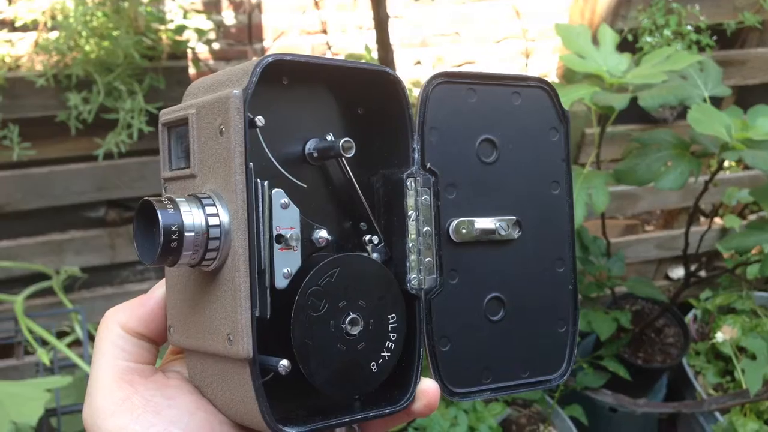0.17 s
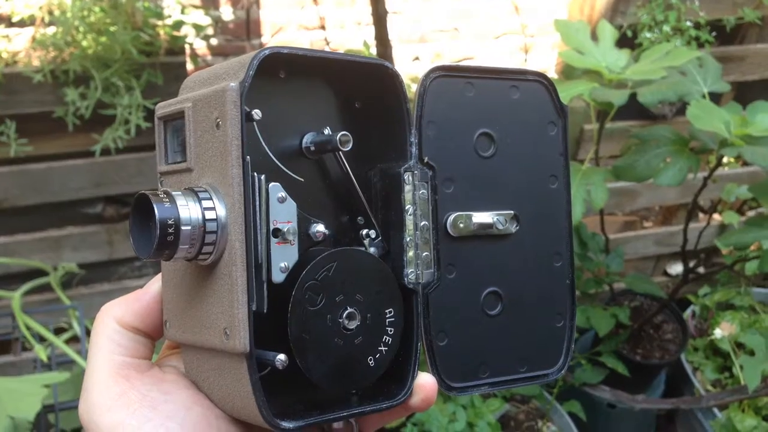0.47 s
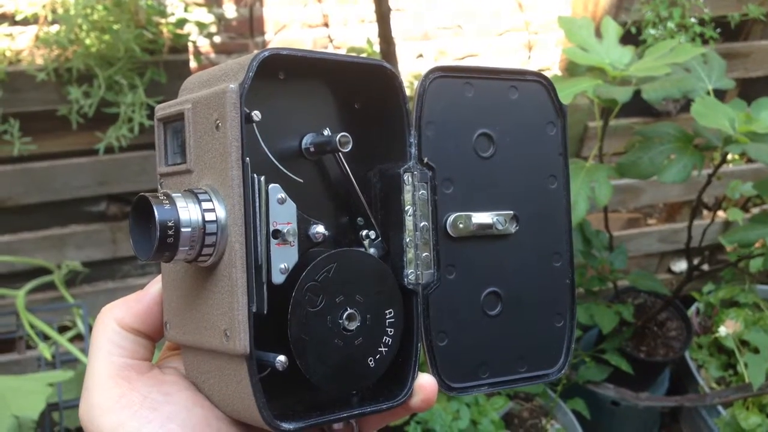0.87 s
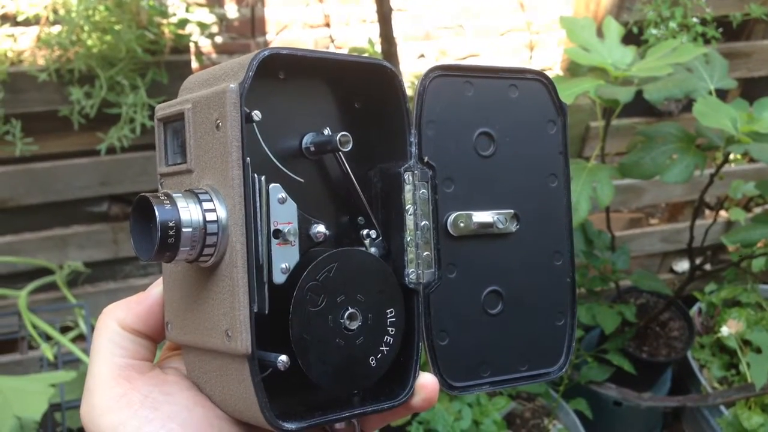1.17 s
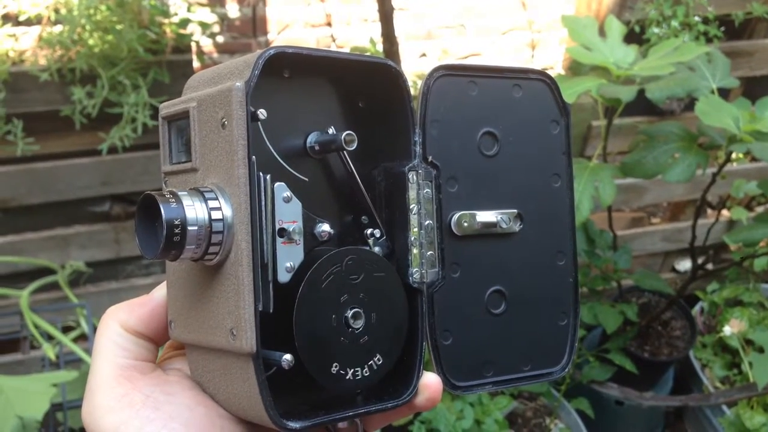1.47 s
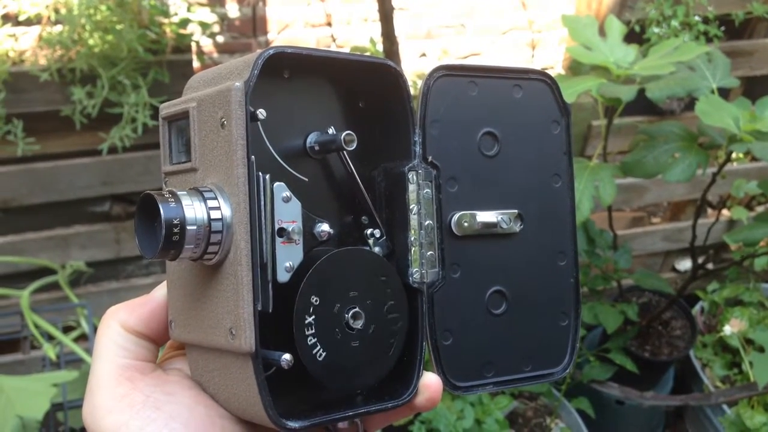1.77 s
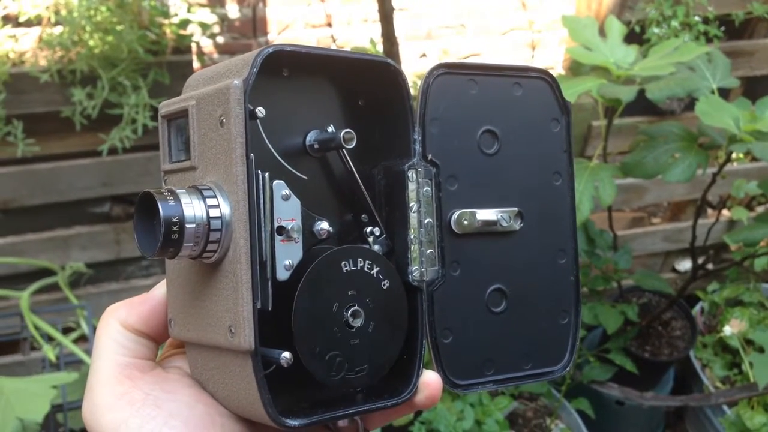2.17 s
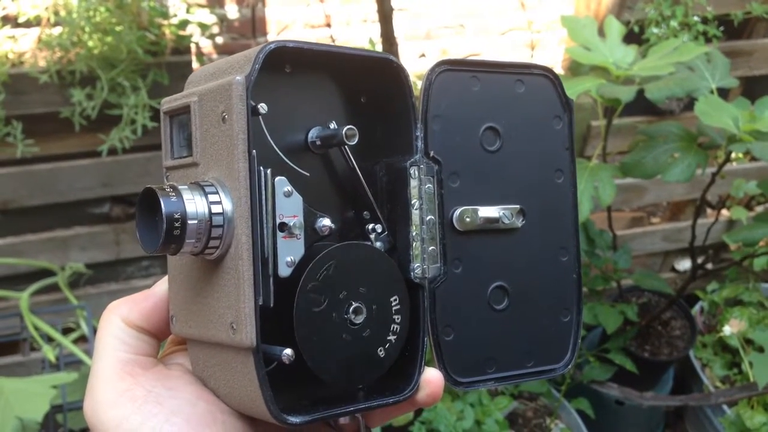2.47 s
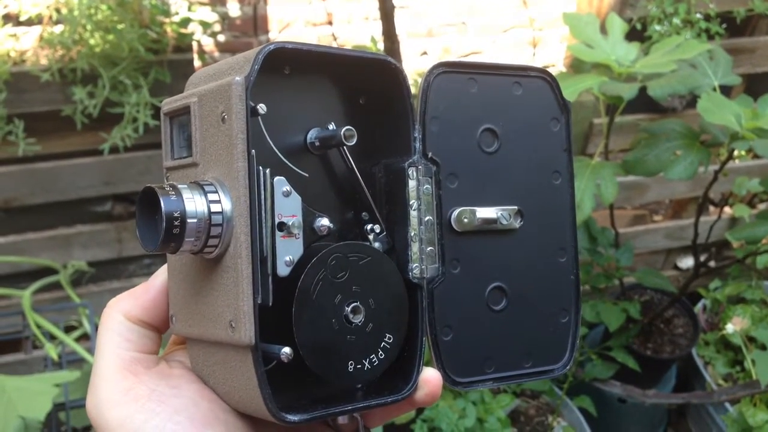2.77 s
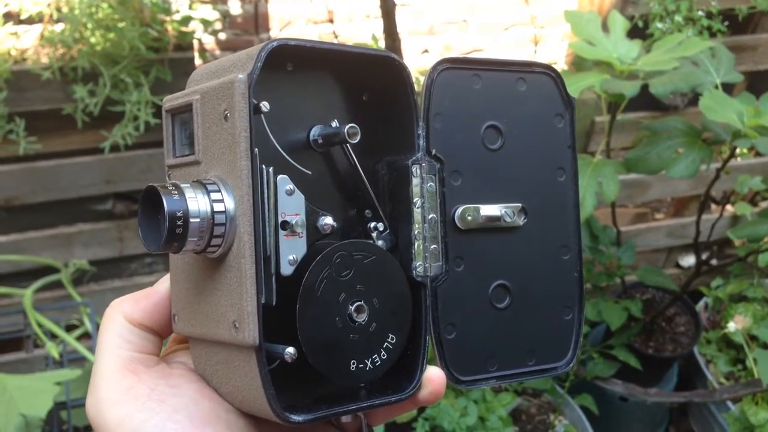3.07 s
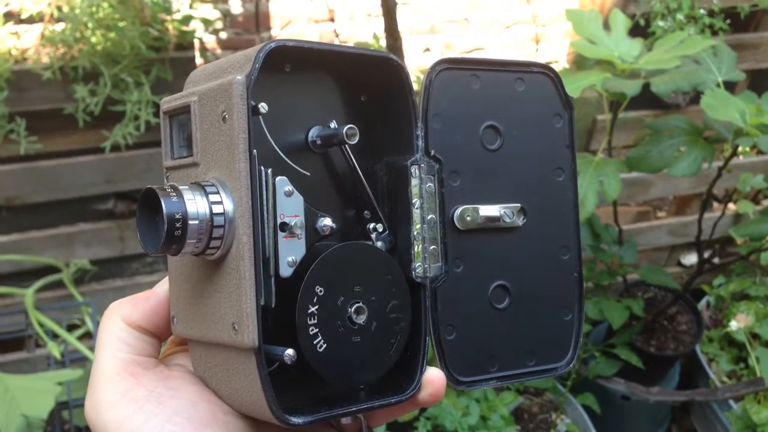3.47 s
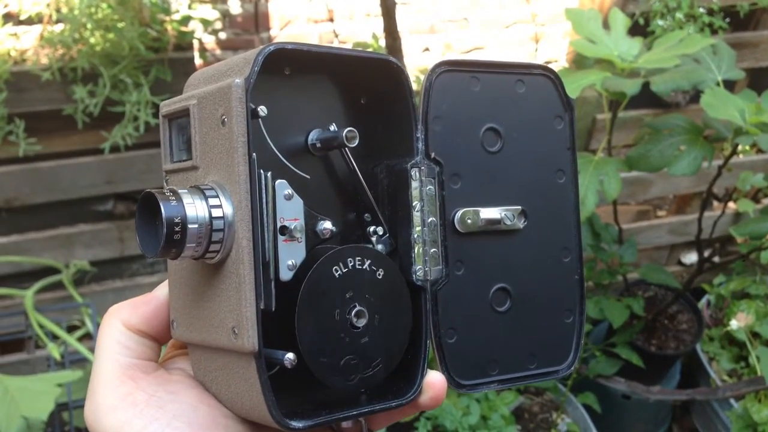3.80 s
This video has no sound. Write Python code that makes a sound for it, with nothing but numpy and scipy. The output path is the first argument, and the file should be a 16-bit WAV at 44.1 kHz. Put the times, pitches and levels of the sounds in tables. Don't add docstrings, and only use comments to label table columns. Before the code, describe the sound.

Spring-driven camera mechanism rattles in quick thin ticks, snaps off, then restarts faintly over outdoor hiss.

```python
import sys
import numpy as np
from scipy import signal
from scipy.io import wavfile
from scipy.ndimage import uniform_filter1d

SR = 44100
rng = np.random.default_rng(int(sys.argv[2]) if len(sys.argv) > 2 else 0)


def volts(x):
    e = np.asarray(x, float) / 20
    return 10 ** e


def log_audio(samples):
    frames = np.atleast_2d(samples).T
    limited = np.clip(frames, -1, 1)
    pcm = np.round(limited * 32767).astype(np.int16)
    wavfile.write(sys.argv[1], SR, pcm)


N = 173754

START_S = .1202
# (frequency [Hz], level [dB per Hz])
LOW_AIR = [(25, -48), (55, -13), (75, -5.5), (95, -12), (125, -3),
           (150, -7.5), (200, -5), (260, -10), (320, -11), (500, -11), (750, -14.5), (1200, -22)]
HISS = [(1000, -1), (2400, -2.5), (2800, -4.5), (3750, -1.5), (4800, -6.5), (7500, -13.5), (12100, -22),
        (15200, -24)]
RUMBLE_SPECTRUM = [(10, -60)] + LOW_AIR + [(2500, -38), (9000, -62)]
HISS_SPECTRUM = [(300, -29.5)] + HISS
RUMBLE_DB, HISS_DB, SWELL_DB = -50.5, -50, .3

# (frequency [Hz], level [dB rms])
HUM = [(59.3, -78), (119.9, -49.5), (158.5, -63.5), (765.4, -68.5), (857.5, -70.5)]
COMPRESSOR_DB = [-64.5, -59.5, -72, -65.5, -74, -69, -69.5, -67.5, -68.5, -73.5]
COMPRESSOR_HZ = 69.12
# (time [s], level [dB rms])
FAN = [(0, -56), (.55, -53), (.85, -59), (1.15, -53), (1.4, -59), (2.2, -63), (2.8, -66), (3.02, -57),
       (3.2, -64), (3.94, -66)]
FAN_HZ = 80.5

# (time [s], level [dB])
DRIVE = [(1.37, -70), (1.39, 2), (1.6, -10), (1.85, -5.5), (2.1, -6.5), (2.4, -5), (2.66, -5), (2.71, -1),
         (2.725, 10), (2.74, -70), (3.165, -70), (3.19, -5.5), (3.5, -3), (3.62, -6), (3.94, -4)]
WHIR_DB, WHIR_FOLLOW = -55, .7

# (time [s], peak level [dB])
LONE_TICKS = [(1.3856, -46), (1.3934, -48), (1.4284, -48), (1.4691, -43), (1.51, -46), (1.5138, -47),
              (1.5355, -52), (2.0535, -46), (2.0685, -45), (2.1437, -49), (2.7965, -54), (2.877, -56),
              (3.1903, -50), (3.1976, -46), (3.2374, -47), (3.3188, -50), (3.3978, -53), (3.4097, -47),
              (3.4355, -49), (3.5004, -50), (3.5553, -49), (3.59, -53), (3.6504, -47), (3.6537, -49),
              (3.6815, -50), (3.6854, -48), (3.776, -47), (3.7818, -50), (3.8675, -52), (3.872, -51),
              (3.8766, -48)]
LONE_DB = 5
SLOW_STROKES = [
    1.3856,
    1.4284,
    1.4691,
    1.51,
    3.1903,
    3.2374,
    3.4097,
]
SLOW_STROKE_DB, GATE_S = -7, .012
# (time [s], grip [dB], pull [dB], return [dB], gate plate ringing [dB])
STROKES = [(1.5593, 0, -10, -10, -8), (1.5904, -2, 5, -10, 4), (1.6213, -10, -3, -10, -8),
           (1.6521, 4, 4, -5, -8), (1.683, 1, 2, 2, 7), (1.7149, -2, 4, -10, 0), (1.7459, -1, 4, -8, 1),
           (1.7762, -6, -1, 1, 3), (1.8097, -10, -7, -5, -3), (1.839, 2, 6, -1, 6), (1.8698, 2, 1, -10, 3),
           (1.9023, -1, 3, 4, 9), (1.9328, 4, 4, 0, -8), (1.9636, 0, 1, -10, 5), (1.9962, 1, 6, -6, 0),
           (2.0272, 2, 5, 2, 7), (2.0586, -3, 0, 4, 7), (2.09, 5, 6, 0, 0), (2.1206, 4, 7, -1, -8),
           (2.152, -3, 4, 4, 1), (2.1831, 0, 5, 0, 5), (2.2139, 3, 1, 1, 2), (2.2451, -1, 6, -7, 4),
           (2.2763, 3, 1, 4, 8), (2.3071, 1, 4, -10, 1), (2.339, 4, 2, 6, 8), (2.3697, 5, 4, 2, 9),
           (2.4008, 9, 2, 3, -6), (2.4323, 2, 1, 4, 11), (2.4632, 0, 5, 3, -5), (2.495, -1, 3, 2, 3),
           (2.5268, 0, 7, 4, -1), (2.5573, 7, 4, -4, -1), (2.5883, 1, 0, 3, 10), (2.6202, 0, 3, 4, 2),
           (2.6508, 1, 1, 4, 7), (2.6825, 1, -4, -5, -8)]
# (first stroke [s], last stroke [s], rate [strokes per s], level [dB])
SECOND_RUN = (3.5565, 3.94, 32.04, -9)
# (delay [s], brightness [dB per octave])
STROKE_PARTS = [
    (-.0001, 1.5),
    (.006, 1),
    (.0099, -1.5),
]
TICK_DB, JITTER_S, SPREAD_DB = -39.5, .00025, 3
# (frequency [Hz], level [dB])
SNAP = [(800, -5), (2000, 0), (4500, 1), (7000, -3), (11000, -8.5), (13300, -15.5), (14300, -22),
        (15300, -24)]
SNAP_DB, SNAP_T60 = -8, .006
# (frequency [Hz], level [dB], t60 [s])
BODY = [(2166, -3, .014), (2568, -5, 0.029), (3385, 0, 0.014), (3910, 2.5, 0.0092), (4440, -9, 0.0056),
        (5000, -3.5, 0.0086), (5505, -3, 0.0088), (6020, -3, 0.0093), (8350, -15.5, 0.0089),
        (9140, -15, 0.009), (11800, -14, 0.013), (12600, -12.5, 0.0091), (12800, -11, 0.011),
        (13800, -21, .01)]
MIX_DB, DETUNE = 4, .006
PLATE_HZ, PLATE_DB, PLATE_T60 = 1592, -54, 0.034

# (time [s], modes level [dB], crack level [dB])
LATCH = [
    (2.7213, -39, -42),
    (2.7255, -13, -29),
    (2.7293, -30, -36),
    (2.7385, -35, -52),
    (2.748, -43, -52),
]
# (frequency [Hz], level [dB], t60 [s])
LATCH_MODES = [(575, -14, 0.05), (870, -15, 0.03), (1150, -12, 0.016), (1400, -9, .016), (1620, -10, .016),
               (1990, -3, 0.026), (2270, -2.5, 0.027), (2570, -12, 0.03), (3380, -20, 0.014),
               (5254, -26, .025), (5642, -14, 0.03), (6400, -25, 0.02), (7300, -25, .012)]
LATCH_RISE_S, LATCH_SHARE = .0009, .55
# (frequency [Hz], level [dB])
CRACK = [(300, -21), (1000, 0), (4500, -4.5), (7000, 1), (9500, -6), (11500, -9), (13000, -13),
         (15500, -16)]
CRACK_T60 = 0.011
# (frequency [Hz], level [dB])
TAIL = [(200, -59), (500, -32), (2200, -1), (6000, -21), (10000, -22.5)]
TAIL_DB, TAIL_T60 = -23, .08

# (time [s], level [dB rms])
ENGINE = [(0, -90), (3.6, -89), (3.75, -60), (3.94, -54.5)]
ENGINE_HZ = 384
EDGE_HZ, EDGE_DB = 15250, -38


def evened(x):
    return x / np.sqrt(np.mean(x ** 2) + 1e-20)


def curve(points):
    s, value = np.transpose(points)
    return np.interp(np.arange(N) / SR, s, value)


def read(points, hz):
    f, value = np.transpose(points)
    return np.interp(np.log(hz + 1), np.log(f + 1), value)


def coloured(x, points):
    log_gain = np.log(volts(read(points, abs(np.fft.fftfreq(2048, 1 / SR)))))
    taps = np.fft.ifft(np.exp(np.conj(signal.hilbert(log_gain)))).real[:1024]
    return signal.oaconvolve(x, taps / np.linalg.norm(taps))[:len(x)]


def slow(hz):
    t = np.arange(0, N + 256, 256) / SR
    rates = hz * np.geomspace(.05, 1, 20)
    waves = sum(np.sin(2 * np.pi * (f * t + rng.random())) / np.sqrt(f) for f in rates)
    return np.interp(np.arange(N) / SR, t, evened(waves))


def ring(hz, t60, size=3000):
    t = np.arange(size) / SR
    return volts(-60 * t / t60) * np.sin(2 * np.pi * hz * t)


def wash(points, db, patchy_db):
    a, b, patches = rng.standard_normal((N // 512 + 6, 1025, 3)).T
    patches = uniform_filter1d(patches, size=20, axis=0)
    patches = evened(uniform_filter1d(patches, size=6, axis=1))
    shape_db = read(points, np.fft.rfftfreq(2048, 1 / SR))[:, None]
    z = (a + 1j * b) * volts(shape_db + patchy_db * patches)
    noise = signal.istft(z, nperseg=2048, noverlap=1536)[1][:N]
    return evened(noise) * volts(db + SWELL_DB * slow(2.84))


def tone(hz, db, level_drift_db=2.5, phase_drift=.4):
    t = np.arange(N) / SR
    level = np.sqrt(2) * volts(db + level_drift_db * slow(5))
    return level * np.sin(2 * np.pi * (hz * t + rng.random()) + phase_drift * slow(4.01))


def garden():
    return wash(RUMBLE_SPECTRUM, RUMBLE_DB, 0.74) + wash(HISS_SPECTRUM, HISS_DB, 0.96)


def mains_hum():
    steady = sum(tone(hz, db, .8, .1) for hz, db in HUM[:2])
    return steady + sum(tone(hz, db) for hz, db in HUM[2:])


def compressor():
    return sum(tone((k + 1) * COMPRESSOR_HZ, db) for k, db in enumerate(COMPRESSOR_DB))


def far_fan():
    return tone(FAN_HZ, curve(FAN))


def gear_whir(window):
    clicks = volts(1.5 * np.minimum(rng.exponential(1, N), 4)) * rng.standard_normal(N)
    rattle = clicks * (rng.random(N) < 5000 / SR)
    return evened(rattle) * volts(WHIR_DB + WHIR_FOLLOW * curve(DRIVE)) * (.5 + window)


def claw():
    first, last, rate, db = SECOND_RUN
    later = np.arange(first, last - .012, 1 / rate)
    later_db = db + SPREAD_DB * rng.standard_normal((len(later), 4))
    strokes = np.r_[STROKES, np.c_[later, later_db]]
    delay, tilt = np.transpose(STROKE_PARTS)
    jitter = JITTER_S * rng.standard_normal((len(strokes), 3))
    at = ((strokes[:, :1] + delay + jitter) * SR).astype(int)
    plate = np.zeros(N)
    plate[at[:, -1]] = volts(PLATE_DB + strokes[:, -1])
    marks = np.zeros(N)
    marks[(np.r_[strokes[:, 0], SLOW_STROKES] * SR).astype(int)] = volts(SLOW_STROKE_DB)
    marks[at[:len(STROKES), 0]] = 1 - volts(SLOW_STROKE_DB)
    t = np.arange(2000) / SR
    gate = np.clip(np.minimum(t, GATE_S + .004 - t) / .003, 0, 1)
    window = signal.oaconvolve(marks, gate)[:N]
    lone_s, lone_db = np.transpose(LONE_TICKS)
    ticks = np.r_[at.ravel(), (lone_s * SR).astype(int)]
    size = np.r_[volts(TICK_DB + strokes[:, 1:-1]).ravel(), volts(lone_db + LONE_DB)]
    tilts = np.r_[np.tile(tilt, len(strokes)), 0.0 * lone_s]
    return ticks, size, tilts, window, plate


def camera():
    at, size, tilts, window, plate = claw()
    gears = gear_whir(window)
    shape = (len(at), len(BODY))
    mix = volts(MIX_DB * rng.standard_normal(shape)) * rng.choice([-1., 1.], shape)
    train = np.zeros(N)
    np.add.at(train, at, size)
    burst = signal.oaconvolve(train, volts(-60 * np.arange(600) / SR / SNAP_T60))[:N]
    out = coloured(volts(SNAP_DB) * burst * rng.standard_normal(N) + gears, SNAP)
    out += signal.oaconvolve(plate + volts(-19) * gears, ring(PLATE_HZ, PLATE_T60))[:N]
    for k, (hz, db, t60) in enumerate(BODY):
        blows = volts(-13.5 + tilts * np.log2(hz / 5000)) * size * mix[:, k]
        for side in (-1, 1):
            train = volts(-25.5) * gears
            np.add.at(train, at, blows * (np.sign(mix[:, k - 1]) == side))
            mode = ring(hz * (1 + side * DETUNE * hz / 13000), t60, size=2000)
            out += volts(db) * signal.oaconvolve(train, mode)[:N]
    return out


def latch():
    t, out = np.arange(3000) / SR, np.zeros(N)
    for s, db, crack_db in LATCH:
        modes = sum(volts(level - 60 * t / t60) * np.sin(2 * np.pi * hz * (t - LATCH_RISE_S))
                    for hz, level, t60 in LATCH_MODES)
        modes = modes * np.minimum(t / LATCH_RISE_S, 1) ** 2
        crack = coloured(rng.standard_normal(len(t)), CRACK) * volts(crack_db - 60 * t / CRACK_T60)
        crack = crack * np.minimum(t / 0.00035, 1)
        tail = coloured(rng.standard_normal(len(t)), TAIL) * volts(TAIL_DB - 60 * t / TAIL_T60)
        out[round(s * SR):][:len(t)] += volts(db) * (LATCH_SHARE * modes + tail) + crack
    return out


def far_engine():
    return tone(ENGINE_HZ, curve(ENGINE))


def scene():
    air = garden() + mains_hum() + compressor() + far_fan()
    return np.tile(air + camera() + latch() + far_engine(), (2, 1))


def top_cut(x):
    return signal.sosfilt(signal.butter(12, 15800, fs=SR, output="sos"), x)


def record(dry):
    taps = signal.firwin(801, EDGE_HZ, window=("kaiser", 6), fs=SR)
    low = signal.oaconvolve(dry, taps[None], "same")
    shelved = low + volts(EDGE_DB) * (dry - low)
    mix = shelved * (np.arange(N) >= START_S * SR)
    return top_cut(mix)


dry = scene()
out = record(dry)
log_audio(out)
```